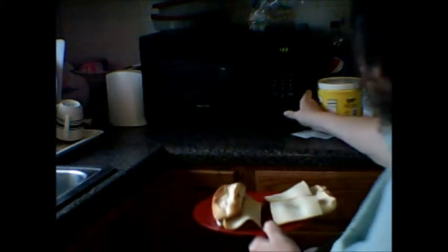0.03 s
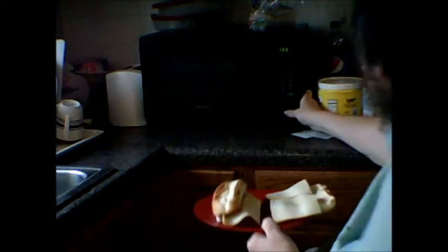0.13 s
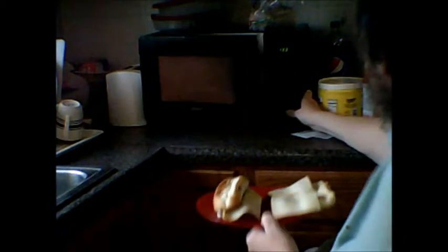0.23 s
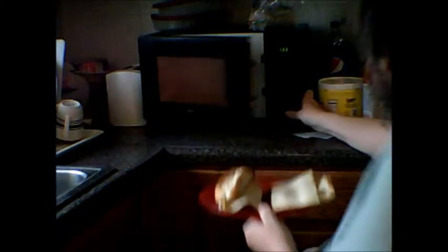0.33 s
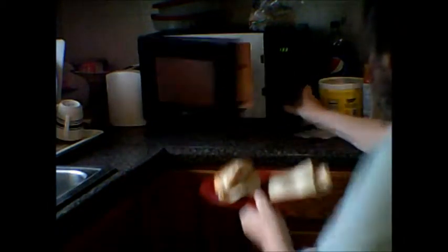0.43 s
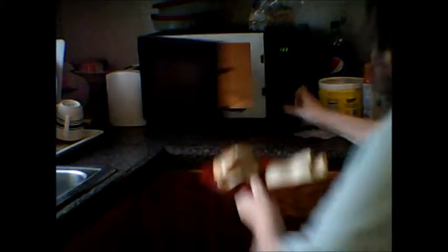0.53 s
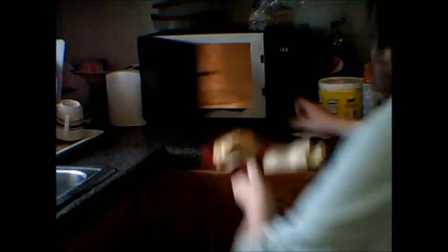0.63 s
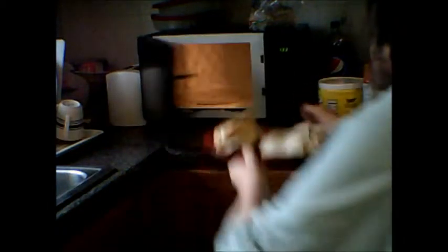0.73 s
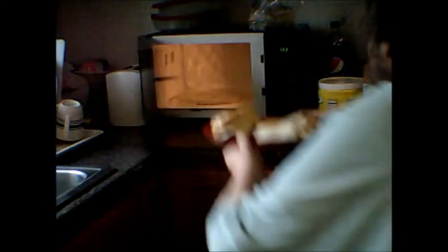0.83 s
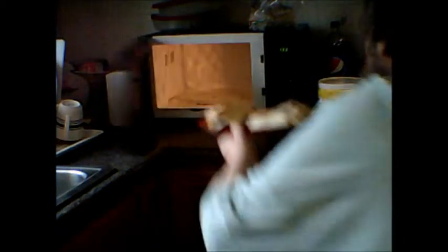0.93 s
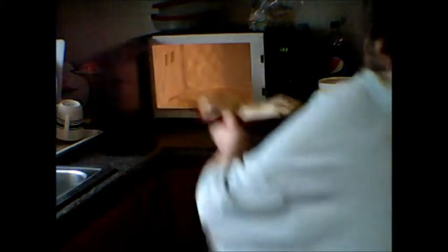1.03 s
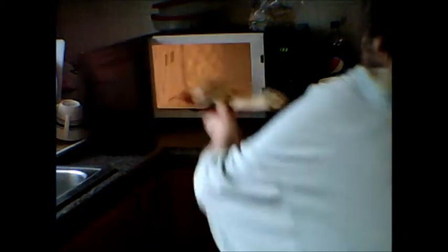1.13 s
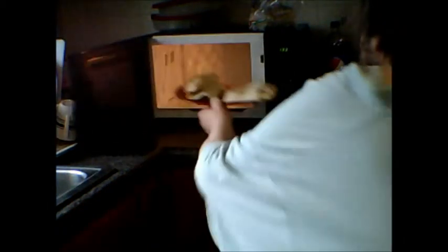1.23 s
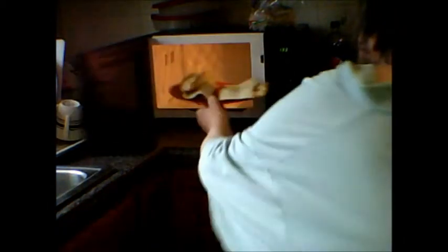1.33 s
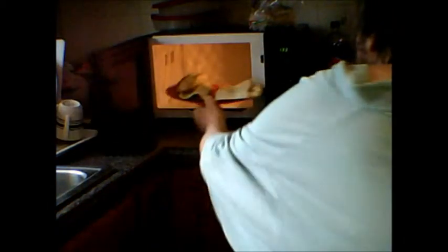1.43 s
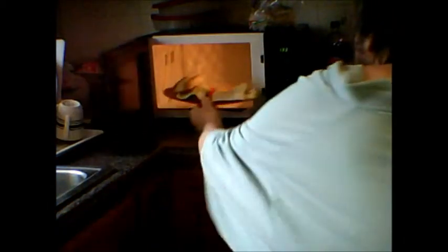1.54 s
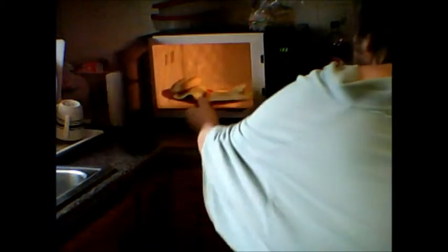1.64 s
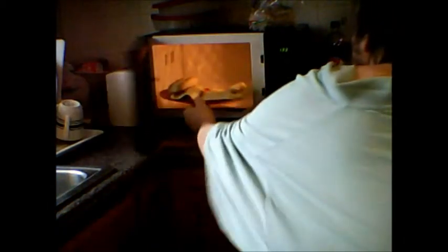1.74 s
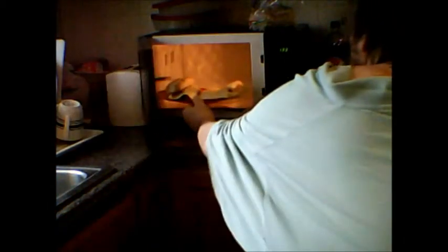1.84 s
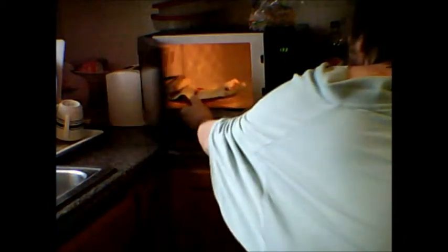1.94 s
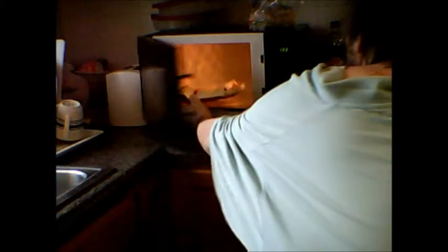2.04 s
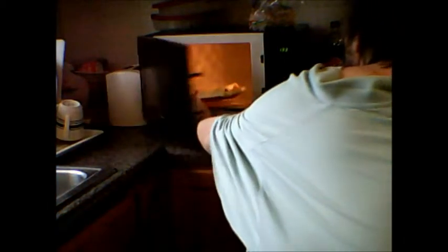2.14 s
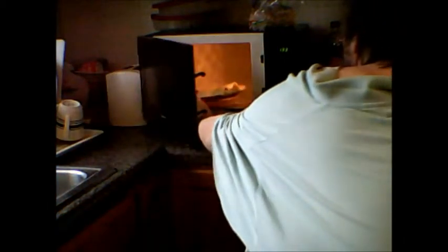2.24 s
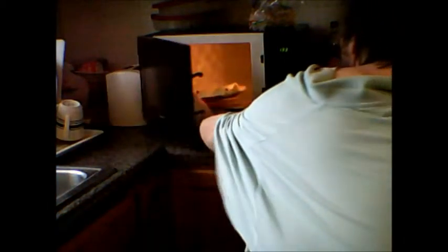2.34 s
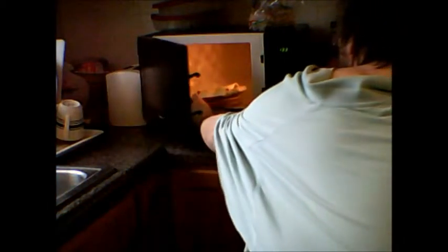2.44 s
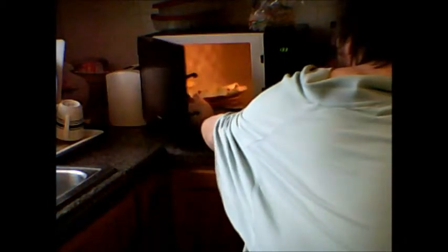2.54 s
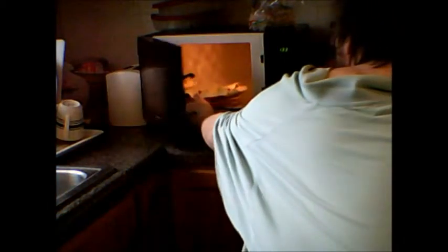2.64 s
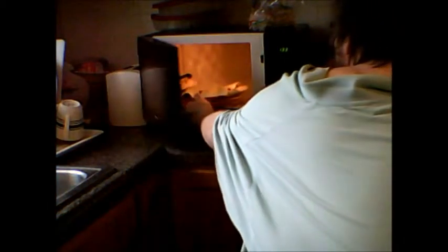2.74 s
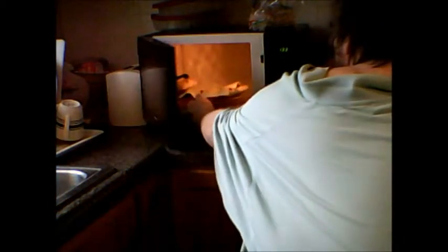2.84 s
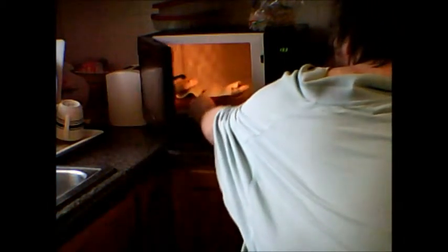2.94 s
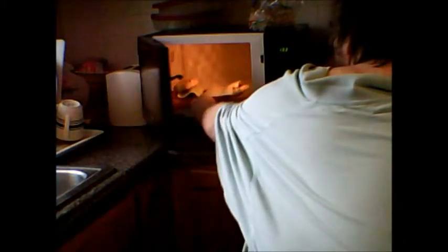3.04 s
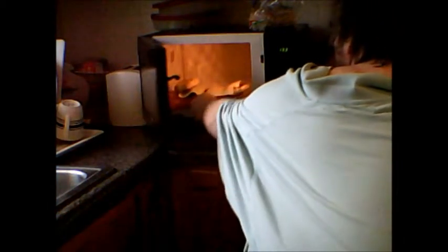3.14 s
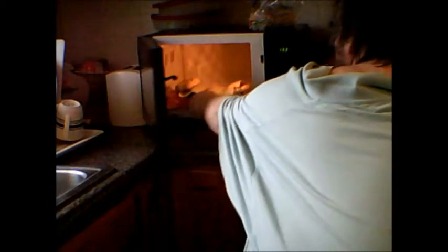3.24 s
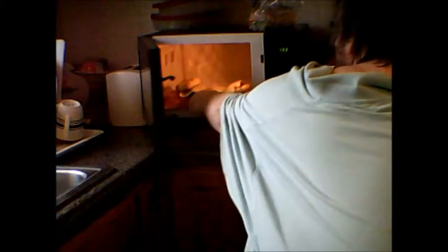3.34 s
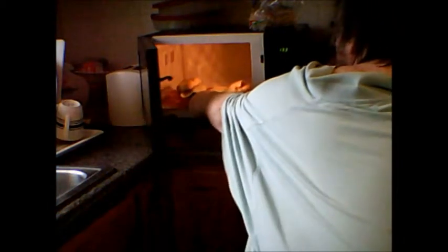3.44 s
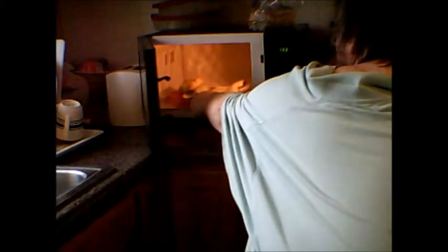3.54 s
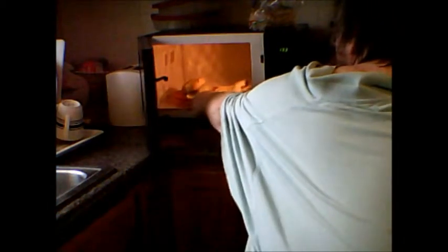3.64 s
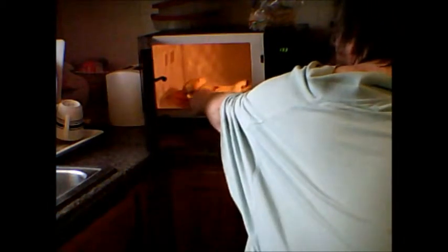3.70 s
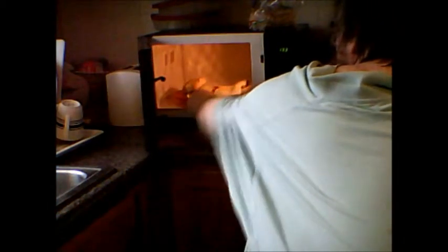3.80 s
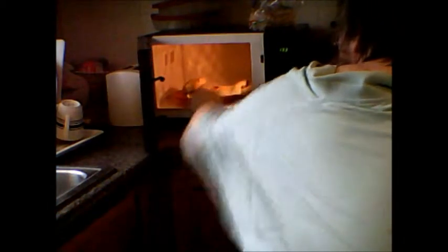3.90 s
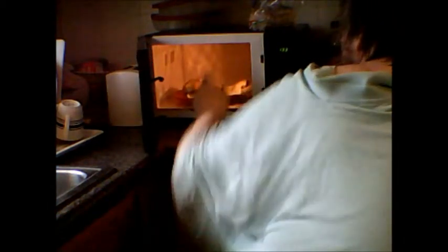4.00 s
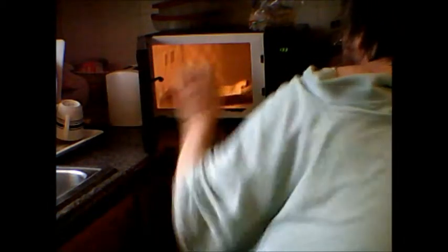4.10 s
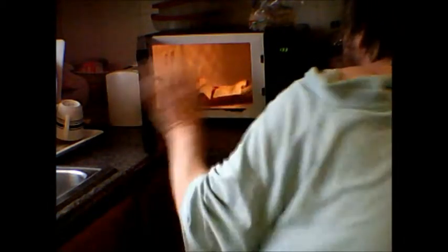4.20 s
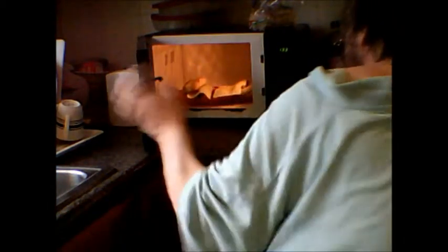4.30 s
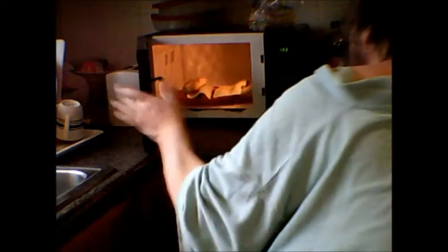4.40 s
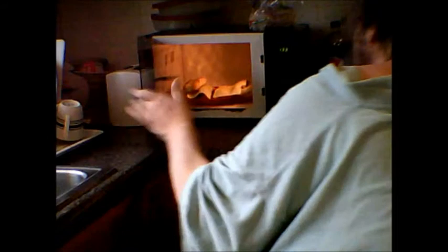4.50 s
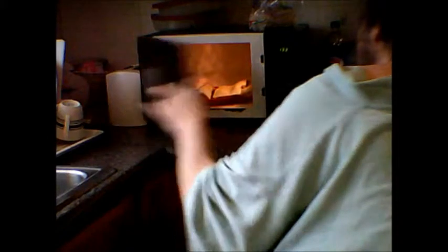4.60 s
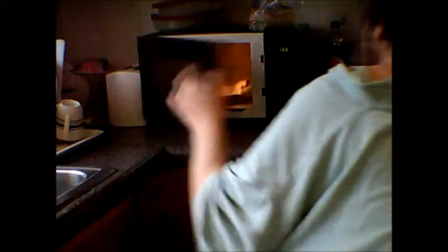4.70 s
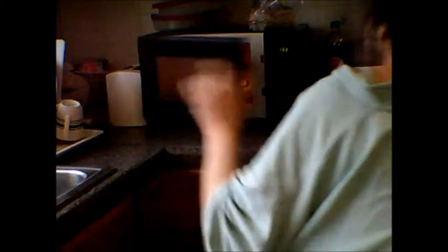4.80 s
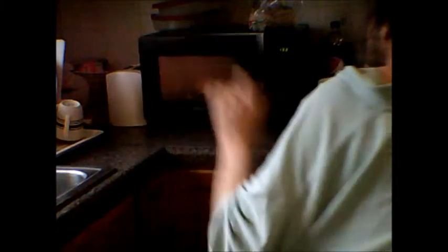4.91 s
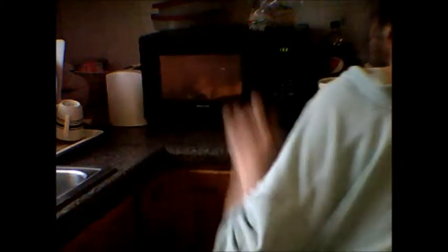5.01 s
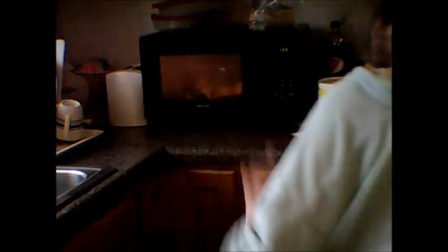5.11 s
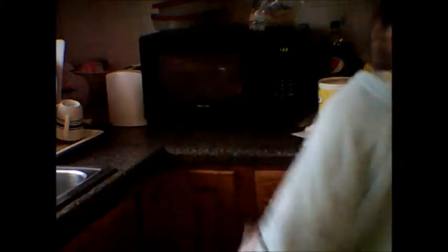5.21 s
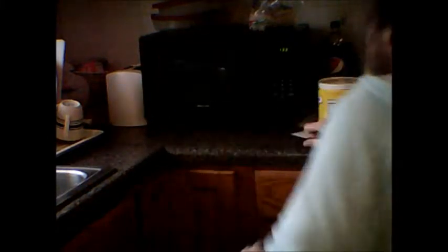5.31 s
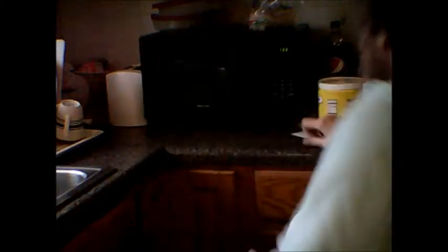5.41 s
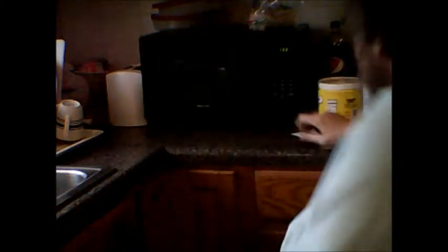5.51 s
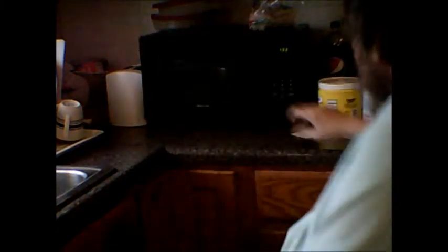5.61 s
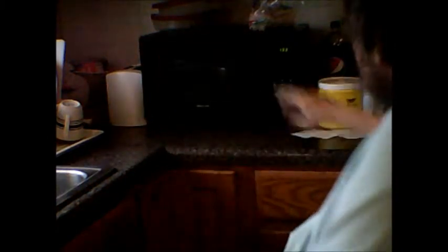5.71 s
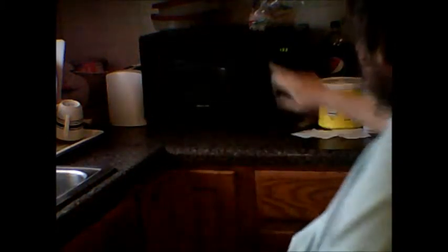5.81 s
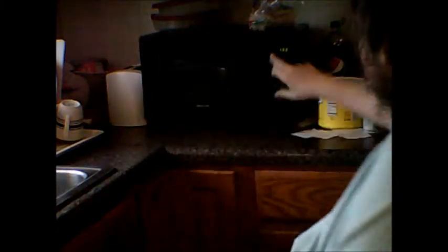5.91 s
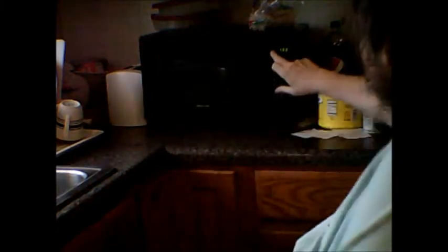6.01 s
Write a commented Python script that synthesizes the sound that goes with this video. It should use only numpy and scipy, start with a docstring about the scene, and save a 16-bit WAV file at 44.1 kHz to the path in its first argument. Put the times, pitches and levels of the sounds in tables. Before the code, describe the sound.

In a small kitchen, heard from a few steps away with a slightly dull tone, a microwave door pops open with a click and swings into its stop with a hollow clack. Soft, irregular knocks follow as a plate is set on the turntable, with faint sleeve brushes. After a short pause the door is thrown shut with a heavy clunk and deep thud, the loudest sound. A low room rumble and appliance hum continue underneath.

```python
"""A small kitchen, with a microwave oven a few steps from a narrow-band microphone.
The button is pushed, the latch springs, the door swings against its stop and a plate is shuffled inside.
A hand takes the door and slams it. Each blow rings the modes of the struck part and leaves a clatter
that dies with the room; heavy blows rock the oven. Behind it lie faint rubs, rumble, hum and whine."""
import sys
import numpy as np
from scipy import signal
from scipy.fft import irfft, next_fast_len
from scipy.io import wavfile

SR = 44100
rng = np.random.default_rng(int(sys.argv[2]) if len(sys.argv) > 2 else 0)


def persist_wave(psi):
    """Save psi, clipped to +-1, as 16-bit WAV."""
    counts = np.round(np.clip(psi, -1, 1) * 32767).astype(np.int16)
    wavfile.write(sys.argv[1], SR, np.atleast_2d(counts).T)


N = 266829
T = np.arange(SR) / SR  # the second that follows a blow

# A soft hand meets the door's edge. In the slam the hooks meet their ramps, the door hits the frame,
# the hooks snap home and the door settles. Each row: start in seconds, then level, bass and treble in dB.
HAND_BLOWS = [(4.342, -38.5, 0, 0)]
SLAM_BLOWS = [(4.876, -32, 12, 4), (4.890, -24.5, 10, -36), (4.921, -13.5, -1, 1), (4.934, -17, -4, -1.5),
              (5.128, -47.5, 11.5, 2)]
# The door's ringing modes. Each row: pitch in Hz, relative level in dB, 60 dB decay time in seconds.
HAND_RING = [(330, -12.5, 0.14), (407, -4, 0.4), (481, -10, .15), (609, -2, 0.2)]
SLAM_RING = [(115, 6, 0.21), (142, 3, 0.24), (238, -9, 0.54), (316, 12, 0.12), (418, -1, 0.2),
             (484.5, -5.5, 0.46), (566, 5, 0.1), (614, -5.5, 0.37), (717, -7, 0.5), (769, -3, 0.18),
             (775, 5, 0.18), (810, -0.5, 0.34), (868, -1.5, 0.26), (941, -4, 0.3), (1109, -9.5, 0.34),
             (1137, -7, 0.213), (1342, -16.5, 0.45), (1395, -5, 0.13), (1442, -2.5, 0.17),
             (1586, -13, 0.28), (1620, -17.5, 0.33), (1760, -10, 0.33), (1780, -14, 0.21), (1960, 2, 0.097),
             (1920, -21, 0.13), (2250, -6, 0.15), (2368, -9, 0.27), (2450, -16, 0.19), (2690, -27, 0.43),
             (3400, -19, 0.21)]
# Its crowd of unresolved modes. Each row: frequency in Hz, relative spectrum level in dB.
HAND_CLATTER = [(80, -10), (330, 10.5), (640, 6), (900, -16), (2400, -19.5), (4500, -49), (8000, -37)]
SLAM_CLATTER = [(70, -3), (150, 4.5), (220, -0.5), (400, 2.5), (600, -2.5), (900, 0.5), (1220, -8),
                (2000, -8.5), (2500, -13.5), (3400, -20), (4100, -33), (5300, -40), (6900, -28.5),
                (8000, -38)]


def door_closing():
    """A hand takes the door and throws it shut: the loudest thing to reach the microphone."""
    hand = strike(HAND_BLOWS, HAND_CLATTER, HAND_RING, clatter_db=-1, linger=0.79, swell_s=0.0015)
    slam = strike(SLAM_BLOWS, SLAM_CLATTER, SLAM_RING,
                  clatter_db=-1, ring_db=1, linger=0.86, swell_s=0.003)
    return hand + slam


# The button levers the hooks up, they spring free, and the door chatters on its hinge stop.
# Each row: start in seconds, then level, bass and treble in dB.
BUTTON_BLOWS = [(0.0, -30.5, -1, 2.5), (0.033, -30, 6.5, 7), (0.057, -33.5, 7.5, -20)]
LATCH_BLOWS = [(0.166, -27.5, 0, -1.5), (0.196, -35, 0, -4.5)]
STOP_BLOWS = [(1.094, -23.5, -1.5, -1), (1.110, -23, -0.34, -4.5)]
# These parts' ringing modes. Each row: pitch in Hz, relative level in dB, 60 dB decay time in seconds.
BUTTON_RING = [(125, 2, 0.27), (173.5, -11.5, 0.47), (299.5, -8, 0.17), (522, -11.5, 0.26),
               (794, -22, 0.52), (814, -17, 0.33)]
LATCH_RING = [(230, -5, 0.23), (271, 10, 0.15), (571.5, -6, 0.6), (710, -9, 0.5), (717, -7, 0.63),
              (847, -4, .42), (954, -7, 0.38), (1165, -12.5, 0.48), (1525, 6, 0.17), (1610, 2, 0.28),
              (1700, -13, 0.27), (1840, -11, 0.37), (1869, -6, 0.38), (1910, -12, 0.26), (2310, -10, 0.35),
              (3710, -12, 0.17)]
STOP_RING = [(112.6, 0.5, 0.32), (236.7, 0.5, 0.32), (313, -7, 0.38), (465, 0, 0.22), (577, -8, 0.28),
             (609, -8.5, 0.31), (671, -10, 0.33), (713, -8, 0.38), (760, -6, .3), (843, -3, 0.33),
             (940, -13, 0.26), (1070, -6, 0.21), (1149, -4.5, 0.27), (1246, -9, 0.2), (1570, -16, 0.24),
             (1680, -23, 0.39), (1734, -22, 0.31), (2540, -33, 0.15)]
# Their unresolved modes. Each row: frequency in Hz, relative spectrum level in dB.
BUTTON_CLATTER = [(40, 5), (120, -7), (250, 0), (600, -7.5), (1100, -11.5), (1600, -20.5), (2200, -20),
                  (3400, -33.5), (4100, -45.5), (5300, -51), (7100, -42), (8000, -51)]
LATCH_CLATTER = [(60, -2.5), (270, -5), (480, -4), (800, 2), (1300, -6.5), (1650, 0), (2400, -8),
                 (3300, -9.5), (4200, -26.5), (5300, -33.5), (7000, -26.5), (8000, -31)]
STOP_CLATTER = [(40, 7), (120, 3), (300, 1.5), (480, -1.5), (820, 1), (1200, -5), (1700, -7), (2500, -15.5),
                (3400, -15), (4100, -30), (5300, -38.5), (7100, -29), (8000, -41)]


def door_opening():
    """A few steps away, the button frees the latch and the door swings into its stop."""
    button = strike(BUTTON_BLOWS, BUTTON_CLATTER, BUTTON_RING,
                    clatter_db=-2.5, ring_db=-3, swell_s=0.0013)
    latch = strike(LATCH_BLOWS, LATCH_CLATTER, LATCH_RING,
                   clatter_db=-1.55, ring_db=-2.5, linger=0.97, swell_s=0.0046)
    stop = strike(STOP_BLOWS, STOP_CLATTER, STOP_RING,
                  clatter_db=-1.05, ring_db=-1, linger=0.91, swell_s=0.0049)
    return button + latch + stop


# The plate's rim bumps the oven floor, then the plate knocks on the glass turntable.
# Each row: start in seconds, then level, bass and treble in dB.
RIM_BLOWS = [(1.882, -32, 0, 0)]
PLATE_BLOWS = [(2.070, -54, -8, -2), (2.135, -45, 2.5, 8), (2.237, -39, 2, 2.5), (2.283, -42, 4.5, 3),
               (2.799, -51, 11, 0), (2.860, -53.5, 14, 0), (3.037, -54.5, -5, 6.5), (3.077, -48.5, -5, -15),
               (3.263, -51.5, -13, 0.5), (3.364, -39.5, -4, -7.5)]
# The modes they ring. Each row: pitch in Hz, relative level in dB, 60 dB decay time in seconds.
RIM_RING = [(230, -8, 0.46), (438, 3, 0.25), (597, -12.5, 0.5), (720, -13, 0.37), (860, -14.5, 0.36),
            (956, -12, 0.21), (1270, -26.5, 0.29), (1400, -23.5, 0.2), (1890, -13, 0.16)]
PLATE_RING = [(238.6, 1, 0.37), (287.4, 2, 0.38), (357.4, 4, 0.33), (402, -7.5, 0.32), (555, 3.5, 0.27),
              (574, -0.5, 0.71), (791, -5, 0.42), (827, -8.5, 0.25), (1290, -17, 0.53), (1630, -14, 0.44),
              (1770, -15.5, 0.35), (2290, -19, .4), (2840, -29, 0.33), (3470, -27.5, 0.27),
              (3510, -35.5, .45), (4400, -43, 0.35), (4840, -48, 0.41)]
# The unresolved modes. Each row: frequency in Hz, relative spectrum level in dB.
RIM_CLATTER = [(60, 2), (250, 1), (480, 7.5), (800, -2), (1350, -1.5), (1900, -9), (2800, -15), (3400, -25),
               (4100, -37), (5300, -44), (7100, -37.5), (8000, -49)]
PLATE_CLATTER = [(60, -9.5), (250, 6.5), (520, 5.5), (800, -1), (1050, -8), (1450, -7.5), (1800, -9.5),
                 (2500, -18), (3400, -20.5), (4100, -42), (5300, -48), (7100, -43.5), (8000, -53)]


def plate():
    """Heard through the open door, a plate bumps in, is set down and is nudged into place."""
    bump = strike(RIM_BLOWS, RIM_CLATTER, RIM_RING, clatter_db=-2, ring_db=1, linger=0.83, swell_s=0.005)
    nudges = strike(PLATE_BLOWS, PLATE_CLATTER, PLATE_RING,
                    clatter_db=-0.5, ring_db=-1.2, linger=0.99, swell_s=0.0015)
    return bump + nudges


def strike(blows, spectrum, modes=(), *, clatter_db, swell_s, ring_db=0, linger=1, build_s=0.0042):
    """Blows on one part: heavy pushes swell slowly, and the ring builds a moment after the clatter."""
    track = np.zeros(N)
    phases = rng.random((len(modes), 1))
    for start, db, bass_db, treble_db in blows:
        sound = gain_of(clatter_db) * clatter(spectrum, bass_db, treble_db, linger)
        if len(modes):
            sound += gain_of(ring_db) * ring(modes, phases, start, bass_db, treble_db) * rise(build_s)
        contact_s = swell_s * 2 ** (bass_db / 6.5)  # the swell time doubles with every 6.5 dB of bass
        add(track, start, gain_of(db) * sound * rise(contact_s))
    return track


def ring(modes, phases, start, bass_db, treble_db):
    """The strongest modes ring as damped sines; each blow feeds, in phase, the ringing already there."""
    hz, db, t60 = np.transpose(modes)[:, :, None]
    sizes = gain_of(db) / np.linalg.norm(gain_of(db)) * touch(hz, bass_db, treble_db)
    waves = np.sin(2 * np.pi * (hz * (start + T) + phases))
    return np.sqrt(2) * (sizes * waves * decay(t60)).sum(0)


def touch(hz, bass_db, treble_db, bass_hz=260, treble_hz=1300):
    """Colour of a contact: a heavy push adds bass, a hard edge adds treble."""
    bass = bass_db / (1 + (hz / bass_hz) ** 4)
    treble = treble_db / (1 + (treble_hz / (hz + 1)) ** 2)
    return gain_of(bass + treble)


# The kitchen's reverberation. Each row: band centre in Hz, 60 dB decay time in seconds at linger = 1.
ROOM_DECAY = [(100, 0.65), (300, 0.48), (800, 0.41), (2000, .42), (4000, 0.41), (7000, 0.37)]


def clatter(spectrum, bass_db, treble_db, linger, ripple_db=3.5, ripple_step_hz=45, ripple_from_hz=1200):
    """Dense modes and reflections merge into a burst that dies band by band with the room."""
    hz = np.fft.rfftfreq(len(T), 1 / SR)
    knots = np.arange(0, SR / 2, ripple_step_hz)
    ripple = np.interp(hz, knots, rng.standard_normal(len(hz))[:len(knots)])
    ripple *= hz / (hz + ripple_from_hz)  # high modes bunch into narrow peaks with dips between
    burst = random_phases(gain_of(curve_at(spectrum, hz) + ripple_db * ripple))
    burst = burst / irfft(burst).std() * touch(hz, bass_db, treble_db)
    centres, t60s = np.transpose(ROOM_DECAY)
    bands = [curve_at(np.c_[centres, weights], hz) for weights in np.eye(len(centres))]
    return sum(irfft(burst * band) * decay(t60 * linger) for band, t60 in zip(bands, t60s))


# Low sways: the whole oven rocks on its feet, and at 1.33 s the open door swings on its hinges. # Each row:
# start in seconds, pitch in Hz, level in dB, 60 dB decay time in seconds.
LOW_SWAYS = [(0.041, 50, -17, 0.33), (1.101, 25.7, -22.5, 0.91), (1.334, 18.65, -27, 0.98),
             (4.913, 45, -14.5, 0.53)]


def rocking(swell_s=0.0096):
    """Heavy blows set the oven swaying on the counter, and the open door swings: deep thuds at the microphone."""
    track = np.zeros(N)
    for start, hz, db, t60 in LOW_SWAYS:
        add(track, start, gain_of(db) * np.sin(2 * np.pi * hz * T) * decay(t60) * rise(swell_s))
    return track


# Faint brushes of sleeve, wrapper and fingers. Each row: start in seconds, level in dB.
RUBS = [(0.868, -56.5), (2.848, -56), (3.495, -58.5), (3.844, -58.5), (4.728, -57), (4.845, -56.5),
        (5.840, -58)]
# Their shared colour. Each row: frequency in Hz, relative spectrum level in dB.
RUB_SPECTRUM = [(100, -16), (700, 9), (1300, 1.5), (2700, 1.5), (3400, 0), (3900, -21), (5200, -19.5),
                (7200, -13), (8000, -23)]


def brushes(bass_db=5, treble_db=-2):
    """Soft rubs by the oven, slow to swell and without any ring."""
    blows = [(start, db, bass_db, treble_db) for start, db in RUBS]
    return strike(blows, RUB_SPECTRUM, clatter_db=-0.5, swell_s=0.0053)


# The kitchen's air and rumble. Each row: frequency in Hz, relative spectrum level in dB.
AIR_SPECTRUM = [(10, 0), (26, 4), (55, -6.5), (85, -11.5), (140, -17.5), (230, -21), (420, -31.5),
                (780, -33), (1200, -42.5), (2300, -45), (3450, -51.5), (3650, -63), (4400, -62.5),
                (4800, -71.5), (7300, -61), (8000, -67.5)]


def room_tone(air_db=-40, hum_hz=123, hum_width_hz=4, hum_db=-55):
    """Steady rumble and hiss around the microphone, with the wavering hum of an appliance."""
    hz = np.fft.rfftfreq(next_fast_len(N, True), 1 / SR)
    air = irfft(random_phases(gain_of(curve_at(AIR_SPECTRUM, hz))))[:N]
    hum_peak = 1 / (1 + ((hz - hum_hz) / hum_width_hz) ** 2)
    hum = irfft(random_phases(hum_peak))[:N]
    return gain_of(air_db) * unit_rms(air) + gain_of(hum_db) * unit_rms(hum)


# A faint whine in the background. Each row: pitch in Hz, rms level in dB.
WHINE_TONES = [(581, -77.5), (1567, -91), (2073, -88.5), (2546, -98.5), (3418, -91.5), (4070, -100),
               (4393, -99), (7327, -99)]


def whine():
    """Thin steady tones just above the hiss."""
    t = np.arange(N) / SR
    return sum(np.sqrt(2) * gain_of(db) * np.sin(2 * np.pi * (hz * t + rng.random()))
               for hz, db in WHINE_TONES)


def rise(seconds):
    """A swell towards 1 with this time constant."""
    return 1 - np.exp(-T / seconds)


def decay(t60):
    """A fall of 60 dB every t60 seconds."""
    return np.exp(-np.log(1000) * T / t60)


def gain_of(db):
    """Decibels to amplitude."""
    return 10 ** (np.asarray(db) / 20)


def unit_rms(x):
    """Scales to rms 1."""
    return x / np.sqrt(np.mean(x ** 2) + 1e-20)


def curve_at(points, hz):
    """Interpolates a table along log frequency."""
    knots, values = np.transpose(points)
    return np.interp(np.log(hz + 1), np.log(knots + 1), values)


def random_phases(magnitudes):
    """A noise spectrum with these magnitudes."""
    return magnitudes * np.exp(2j * np.pi * rng.random(len(magnitudes)))


def add(track, start, sound):
    """Lays a sound into the track at start seconds."""
    part = track[max(round(start * SR), 0):][:len(sound)]
    part += sound[:len(part)]


def scene():
    """Oven and kitchen meet at one microphone, a few steps from the door."""
    return (door_opening() + plate() + brushes() + door_closing() + rocking() + room_tone() + whine())[None]


def record(dry, ceiling=0.53, band_edge_hz=7924):
    """The microphone rounds off the loudest peaks and passes only the band below its edge."""
    rounded = dry / (1 + (dry / ceiling) ** 6) ** (1 / 6)
    low_pass = signal.firwin(255, band_edge_hz, window=("kaiser", 8), fs=SR)
    padded = np.pad(rounded, ((0, 0), (127, 127)), "edge")
    return signal.oaconvolve(padded, low_pass[None], "valid")


dry = scene()
out = record(dry)
persist_wave(out)
```